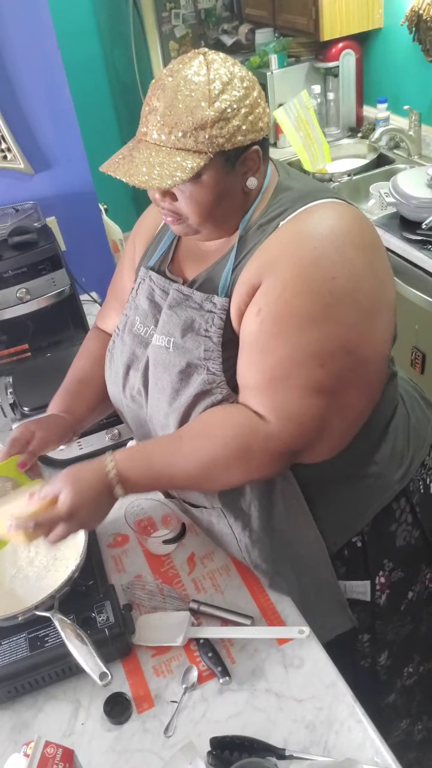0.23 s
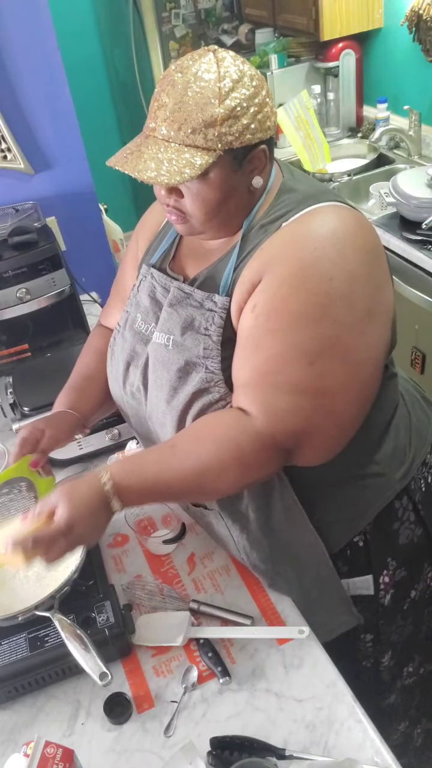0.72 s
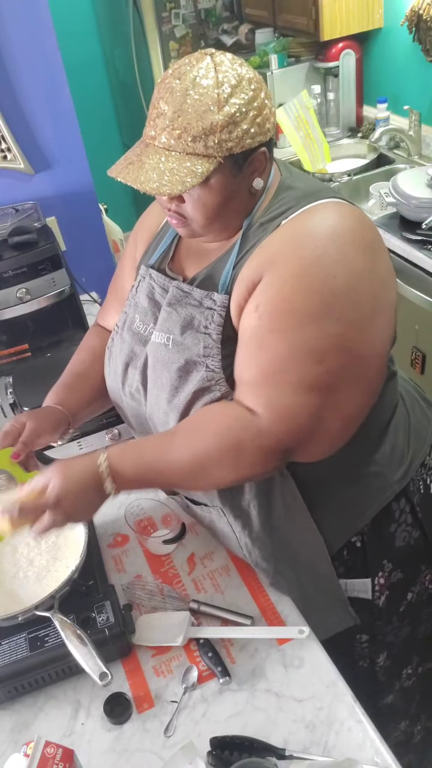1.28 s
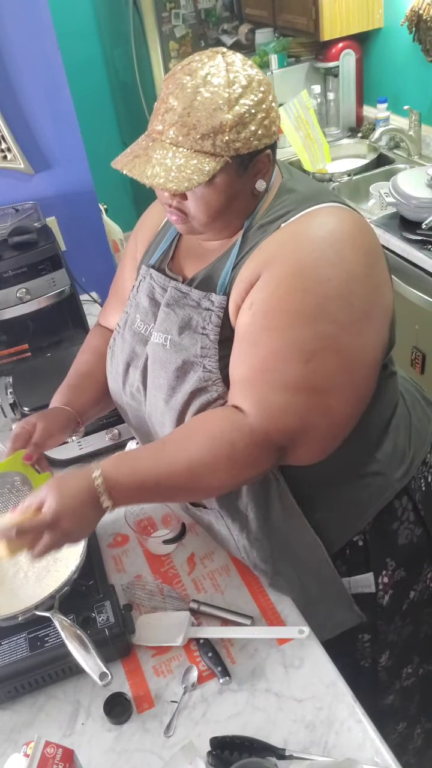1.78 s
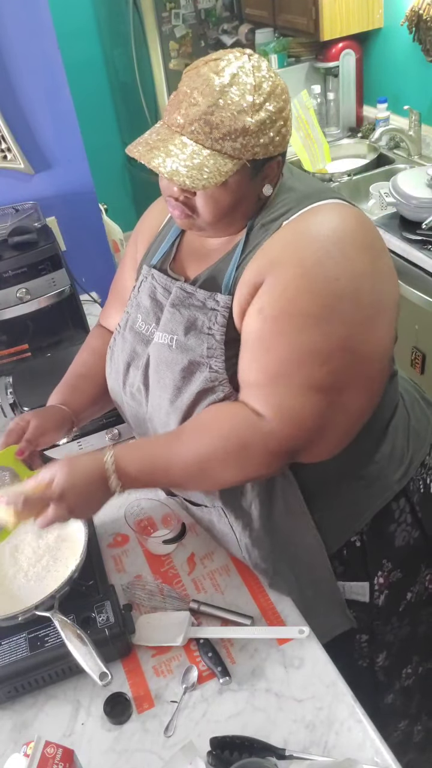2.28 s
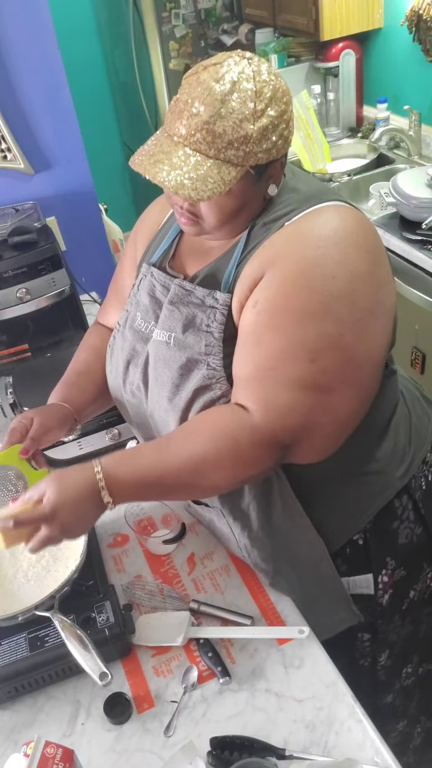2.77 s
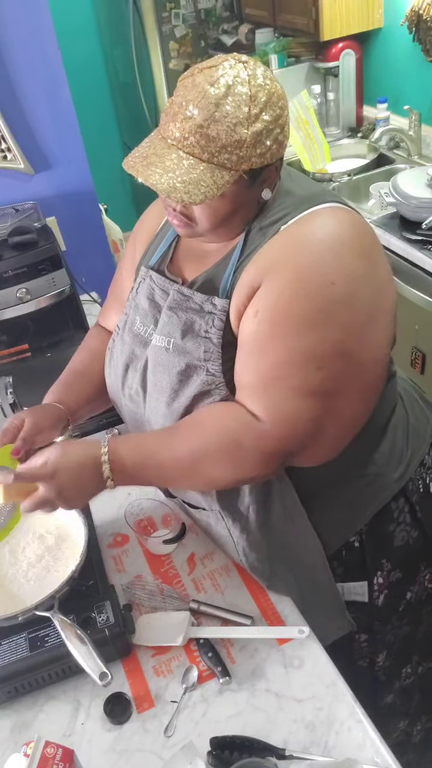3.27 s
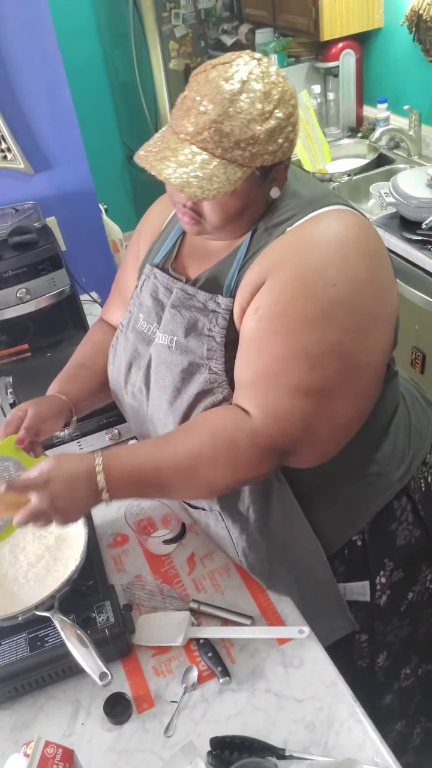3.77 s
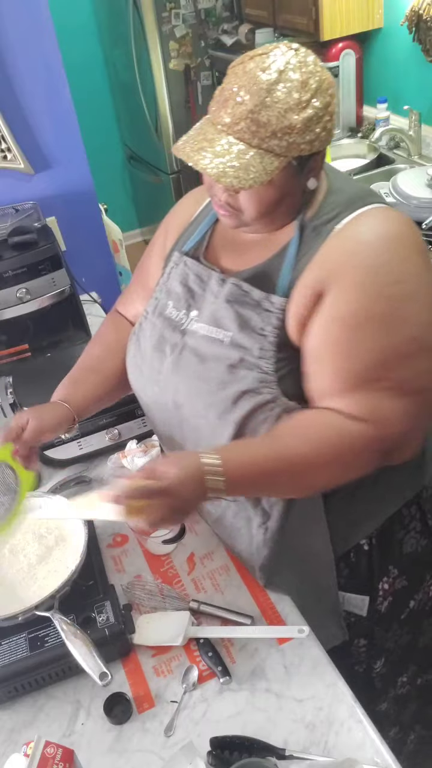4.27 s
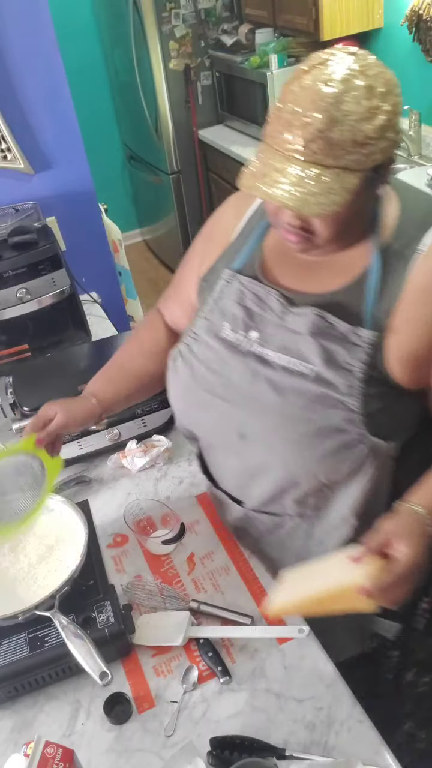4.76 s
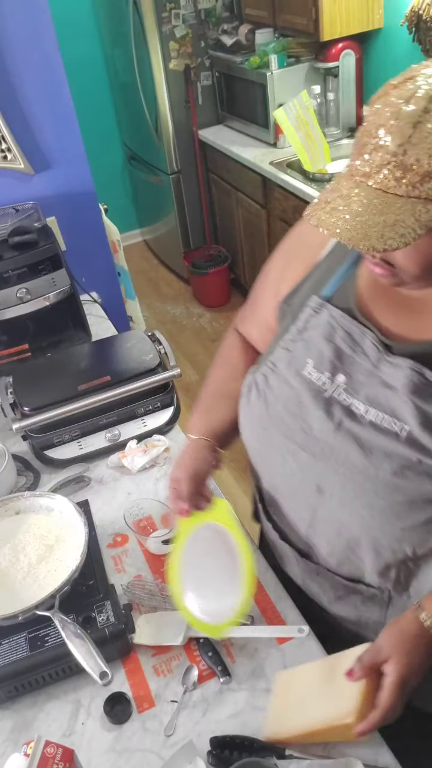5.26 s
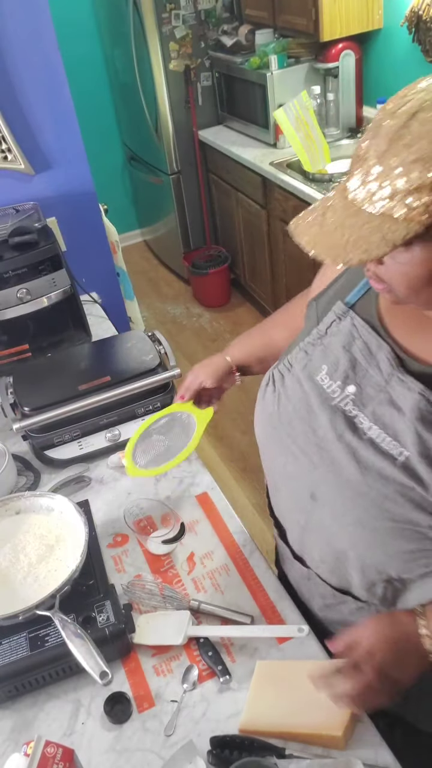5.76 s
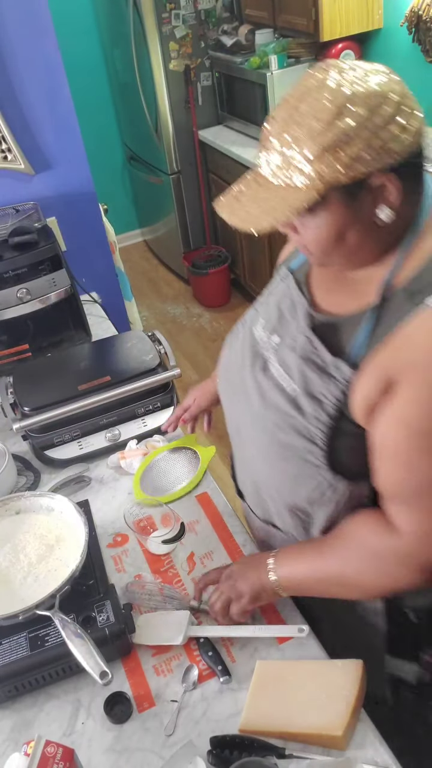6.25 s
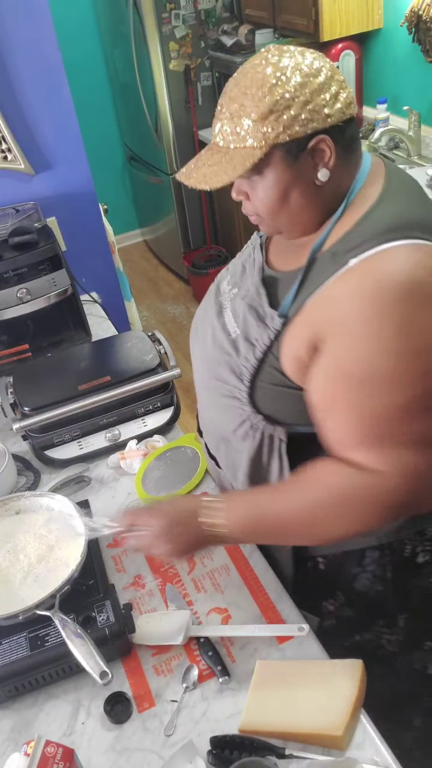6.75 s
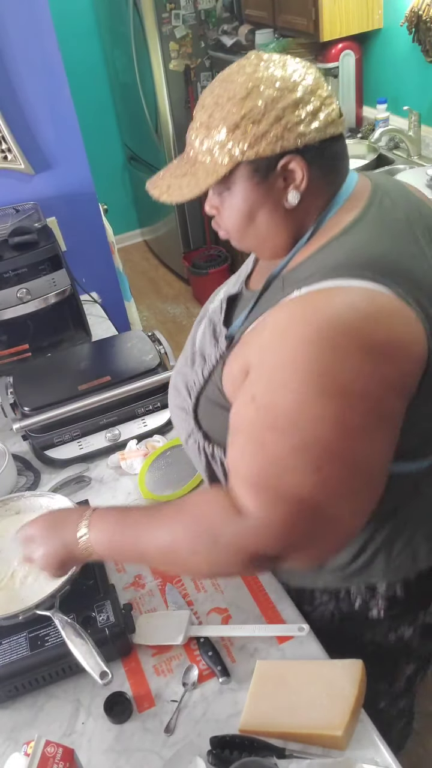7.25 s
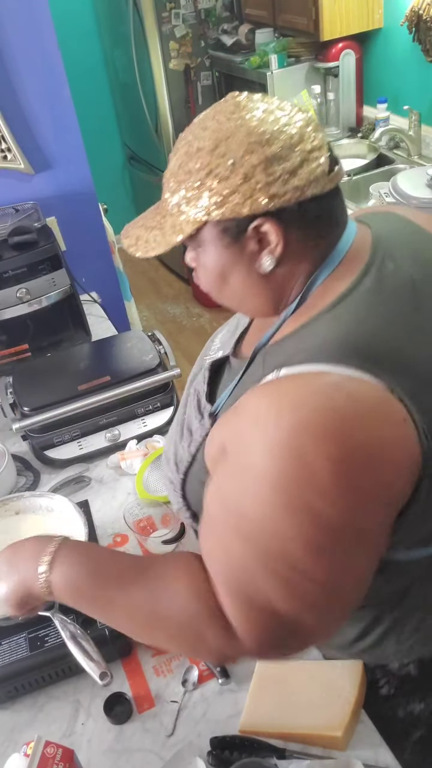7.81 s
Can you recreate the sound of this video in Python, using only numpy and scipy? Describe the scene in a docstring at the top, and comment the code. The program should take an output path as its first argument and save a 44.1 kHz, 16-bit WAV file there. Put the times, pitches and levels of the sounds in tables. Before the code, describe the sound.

A small hard-walled kitchen, heard closely in stereo, with a low rumble, faint appliance hum and a dull hiss that comes and goes. From 0.2 to about 3.8 seconds, cheese is rubbed on a hand grater in quick, uneven strokes, five or six a second: a quiet fine rasp, a duller plate rub and small hollow bumps, strongest at first. After light hand slides, the grater knocks a pan rim at 4.5, 4.6 and 4.8 seconds, ringing hollow and then brighter on the last. A soft, low footfall lands at 5.2. At 5.54 the heavy cheese block slaps the counter, booming with a slight utensil ring. A thin wire shimmer and plastic clatter follow around 5.9-6.2, then light brushing. From 6.8 to the end near 8 seconds, a wire whisk sweeps the pan about six times a second, scraping, ringing and splashing firmly.

```python
"""In a small, hard kitchen with a low room rumble, cheese is rubbed over a flat hand grater in quick strokes.
The grater is tapped three times on a pan rim, feet land, the cheese drops on the counter, tools clatter.
Then a wire whisk starts to stir the pan. Scraping sounds are random tiny snaps, coloured and shaped into strokes;
blows are fading tones plus short noise bursts. Echoes are added to the scrapes and the bursts."""
import sys
import numpy as np
from scipy import signal
from scipy.fft import rfft, irfft, next_fast_len
from scipy.io import wavfile

SR = 44100
rng = np.random.default_rng(int(sys.argv[2]) if len(sys.argv) > 2 else 0)


def transcribe(u):
    """Save the signal u as a 16-bit wav file named by the first command-line argument.

    u: samples, shape (n,) or (channels, n), limited to [-1, 1]; the rate is SR.
    q: integer samples, one column per channel.
    """
    v = np.clip(np.atleast_2d(u).T, -1, 1)
    q = np.round(v * 32767).astype(np.int16)
    wavfile.write(sys.argv[1], SR, q)


N = 354123  # length of the scene in samples


def amp(db):
    """Turn decibels into a gain."""
    return 10 ** (np.asarray(db) / 20)


def unit(x):
    """Scale a signal to an rms (average strength) of 1."""
    return x / np.sqrt(np.mean(x ** 2) + 1e-20)


def along(points, hz):
    """Read a curve of (frequency [Hz], value) points, spaced on a log axis."""
    point_hz, values = np.transpose(points)
    return np.interp(np.log(hz + 1), np.log(point_hz + 1), values)


def add(track, s, x):
    """Mix x into the track, starting at s seconds."""
    part = track[..., round(s * SR):][..., :x.shape[-1]]
    part += x[..., :part.shape[-1]]


def filtered(x, response):
    """Multiply the spectrum of x by a response that depends on frequency."""
    n = x.shape[-1]
    padded = next_fast_len(n + SR // 2, True)
    hz = np.fft.rfftfreq(padded, 1 / SR)
    return irfft(rfft(x, padded) * response(hz), padded)[..., :n]


def coloured(x, spectrum):
    """Give x a colour of (frequency [Hz], level [dB]) points."""
    return filtered(x, lambda hz: amp(along(spectrum, hz)))


def resonate(x, modes):
    """Let x excite resonances of (frequency [Hz], width [Hz], level [dB])."""
    def response(f):
        return sum(amp(db) * 1j * f * width / (centre ** 2 - f ** 2 + 1j * f * width)
                   for centre, width, db in modes)
    return filtered(x, response)


def grains(rate, spread_db):
    """Make random tiny snaps of unequal size, on average rate of them a second."""
    happens = rng.random(N) < rate / SR
    sizes = rng.standard_normal(N) * amp(spread_db * rng.standard_normal(N))
    return unit(happens * sizes)


# how alike the two microphones hear a sound: (frequency [Hz], left-right likeness [-1 to 1])
ALIKE = [(100, 0.97), (300, 0.79), (700, 0.56), (1200, -0.14), (2300, -0.11), (6000, 0.0036),
         (10000, -0.018)]


def half_turn(alike, hz):
    """Half the phase angle between the microphones that gives the wanted likeness."""
    return np.arccos(np.clip(along(alike, hz), -1, 1)) / 2


def ring(modes, attack, alike=ALIKE):
    """Fading tones after one blow; the higher ones reach the two microphones out of step."""
    t = np.arange(SR) / SR
    out = np.zeros((2, SR))
    for hz, t60, db in modes:
        apart = half_turn(alike, hz) * rng.choice([-1, 1])
        fade = amp(db - 60 * t / t60)
        out += fade * np.sin(2 * np.pi * hz * t + np.array([[apart], [-apart]]))
    return out * (1 - np.exp(-t / attack)) * (1 - t ** 4)  # soft start, silent end


def diffuse(pair):
    """Blend two unrelated signals as two close microphones hear them: alike in the bass only."""
    def blend(hz):
        turn = half_turn(ALIKE, hz)
        return np.array([np.cos(turn), np.sin(turn)])
    mid, side = filtered(pair, blend)
    return np.array([mid + side, mid - side])


# how long the room's echoes last: (frequency [Hz], time to fall by 60 dB [s])
KITCHEN = [(80, 0.34), (300, 0.29), (1000, 0.38), (4000, 0.29), (8000, 0.33), (15000, 0.28)]


def kitchen(x, direct_db):
    """Add the walls' dense echoes; direct_db sets the direct sound against them, at about the same energy."""
    hz, t, bins = signal.stft(rng.standard_normal((2, SR // 2)), SR, nperseg=256)
    fade = amp(-60 * t / along(KITCHEN, hz)[:, None])
    tail = diffuse(signal.istft(bins * fade, SR, nperseg=256)[1])
    tail = np.pad(tail / np.linalg.norm(tail[0]), ((0, 0), (SR // 500, 0)))  # echoes start 2 ms late
    tail[1, 0] = tail[0, 7] = amp(direct_db)  # the right microphone is nearer: 7 samples earlier
    return signal.fftconvolve(x[None], tail / np.linalg.norm(tail[0]), axes=1)[:, :N]


def knock(colour_db, t60, direct_db, size=4096):
    """A short coloured noise burst in the room, of rms 1 over a tenth of a second."""
    # turn the colour into a filter that does not start before the blow (minimum phase)
    cepstrum = irfft(colour_db(np.fft.rfftfreq(size, 1 / SR)) * np.log(10) / 20)
    causal = np.r_[cepstrum[0], 2 * cepstrum[1:size // 2], np.zeros(size // 2)]
    colour_filter = irfft(np.exp(rfft(causal)))
    t = np.arange(SR // 4) / SR
    burst = rng.standard_normal(len(t)) * amp(-60 * t / t60)
    x = kitchen(signal.fftconvolve(burst, colour_filter), direct_db)
    return x / np.sqrt(np.sum(x ** 2) / 2 / (SR / 10))


def moving(x, gain, direct_db, shift_db, size=12288):
    """A travelling contact: its colour and its echo pattern keep changing. The level follows gain."""
    out, window = np.zeros((2, N)), np.hanning(size) ** .5
    bands = np.geomspace(400, 15000, 18)
    for i in range(-size // 2, N, size // 2):  # overlapping pieces
        start = max(i, 0)
        if gain[start:start + size].max() > 1e-5:  # skip silent pieces
            piece = x[start:start + size] * window[:N - start]
            shifts_db = shift_db * rng.standard_normal(len(bands))
            piece = coloured(piece, np.c_[bands, shifts_db])
            add(out, start / SR, kitchen(unit(piece), direct_db))
    return gain * out


CATCH_PER_S, CATCH_DB = 70, 1.33  # a stroke catches and slips: random level points a second, spread [dB]


def stroked(starts, lengths, levels_db, attack_s, sag_db_per_s, release_db_per_s):
    """The gain of a series of uneven strokes: each swells, sags while it lasts and then dies away."""
    power, t = np.zeros(N), np.arange(SR // 2) / SR
    swell = np.sin(np.pi / 2 * np.minimum(t / attack_s, 1)) ** 2
    for s, length, db in zip(starts, lengths, levels_db):
        sag_db = sag_db_per_s * np.maximum(t - attack_s, 0)
        release_db = release_db_per_s * np.maximum(t - length, 0)
        add(power, s, (swell * amp(db - sag_db - release_db)) ** 2)
    knots = rng.standard_normal(size=4096)
    catches = np.interp(np.arange(N) / SR * CATCH_PER_S, np.arange(len(knots)), knots)
    return np.sqrt(power) * amp(CATCH_DB * catches)


# colour of the low rumble: (frequency [Hz], relative level [dB])
ROOM_TONE = [(20, -52.5), (45, -3.5), (66, 3), (100, 0), (150, -13), (300, -14.5), (600, -28), (1200, -29),
             (3000, -34), (6000, -38), (8500, -51), (15000, -39)]
# steady tones of an appliance: (frequency [Hz], rms level [dB])
HUM = [(68, -64), (239, -66.5)]


def room_tone():
    """A low rumble of coloured noise with a faint appliance hum of pure tones."""
    t = np.arange(N) / SR
    hum = sum(amp(db) * np.sqrt(2) * np.sin(2 * np.pi * hz * t) for hz, db in HUM)
    rumble = diffuse(coloured(rng.standard_normal((2, N)), ROOM_TONE))
    return hum + amp(-55.0) * unit(rumble)


# how the hiss swells and fades: (time [s], level [dB])
HISS_LEVEL = [(0.0, -62), (0.18, -89), (0.75, -62.5), (1.09, -77), (1.45, -57.5), (1.75, -61.5),
              (2.07, -76.5), (2.45, -60.5), (2.76, -84), (2.9, -60.5), (3.62, -77), (3.78, -63),
              (4.182, -60), (4.45, -91), (5.45, -56.5), (5.85, -62.5), (6.45, -60), (6.619, -92.5)]
# colour of the hiss: (frequency [Hz], relative level [dB])
HISS = [(400, -9), (560, -3), (720, -18), (950, -8), (1650, -23.5), (2100, -16), (2400, -17.5),
        (3050, -17.5), (3500, -21.5), (4050, -18), (4500, -37.5), (4850, -25.5), (5150, -30), (5800, -21),
        (6500, -37.5), (12000, -49)]


def hiss():
    """A faint, dull hiss of coloured noise comes and goes in the background."""
    level_db = np.interp(np.arange(N) / SR, *np.transpose(HISS_LEVEL))
    noise = coloured(rng.standard_normal((2, N)), HISS)
    noise = filtered(noise, lambda hz: hz ** 2 / (hz ** 2 + 350 ** 2))  # thin out the bass
    return amp(level_db) * unit(diffuse(noise))


# weight lands on the floor: (time [s], relative level [dB])
STEPS = [(5.209, -21.5), (5.285, -29), (5.365, -34), (5.743, -42), (6.722, -43.5)]
# tones of the floor boards: (frequency [Hz], time to fall by 60 dB [s], relative level [dB])
FLOOR = [(43.2, 0.37, -14), (72.7, 0.25, 0.5), (79.9, 0.24, -4.5), (127.6, 0.19, -15.5)]
# colour of the sole's pat: (frequency [Hz], relative level [dB])
SOLE = [(80, 6), (350, -8), (800, -15.5), (2000, -21.5), (6000, -39.5), (9000, -58)]
# likeness when floor or counter shakes: (frequency [Hz], left-right likeness [-1 to 1])
SHAKEN = [(80, 0.1), (130, 0.38), (300, 0.62), (700, 0.7), (1200, -0.2), (2300, -0.1)]


def steps():
    """A soft sole pats the floor and sets the boards swinging at their low pitches."""
    out = np.zeros((2, N))
    for s, db in STEPS:
        add(out, s, amp(db + 7) * ring(FLOOR, attack=0.025, alike=SHAKEN))
        add(out, s, amp(db - 20.5) * knock(lambda hz: along(SOLE, hz), t60=0.16, direct_db=-1.5))
    return out


# tools touch and rattle, and the sole squeaks as the feet land at 5.2 s: (time [s], relative level [dB], treble
# tilt [about dB per octave])
CLATTER = [(0.917, -51.5, -2), (5.209, -52, 4), (5.23, -47.5, 5), (5.994, -28.5, 6.5), (6.115, -21, 0.5),
           (6.124, -43, -7), (6.147, -24.5, -3.5), (6.174, -24, -2.5), (6.194, -32.5, -1),
           (6.207, -35, -19.5)]
# colour of a rattle: (frequency [Hz], relative level [dB])
TOOL = [(88, -27), (150, -31), (216, -12), (343, -11), (505, 1), (649, -7), (728, -3), (936, -7),
        (2360, -11.5), (5950, -24.5), (8750, -41), (15000, -42.5)]
# light slides of hand and tools: (middle time [s], length [s], level [dB])
SLIDES = [(4.292, 0.11, -54), (4.475, 0.14, -54), (5.313, 0.24, -66.5), (5.468, 0.048, -57),
          (6.39, 0.15, -58.5), (6.503, 0.14, -55), (6.754, 0.18, -58.5)]
# colour of a slide: (frequency [Hz], relative level [dB])
SLIDE = [(600, -57.5), (1800, 2), (3000, 3.5), (6000, -5), (8500, -17.5), (12000, -15.5), (15000, -22.5)]


def tools():
    """The plastic grater rattles to rest in short bursts and a sole squeaks as the feet land; hand and tools
    brush over the counter."""
    out, brush = np.zeros((2, N)), np.zeros(N)
    for s, db, tilt_db in CLATTER:
        colour = lambda hz: along(TOOL, hz) + tilt_db * np.log2(1 + hz / 500)
        add(out, s, amp(db - 16.0) * knock(colour, t60=0.0041, direct_db=-10.5))
    for s, length, db in SLIDES:
        add(brush, s - length / 2, amp(db) * np.hanning(int(length * SR)) ** .5)
    rubbing = unit(coloured(grains(3400, 2.7), SLIDE))
    return out + kitchen(brush * rubbing, direct_db=-5)


# one light touch of the whisk: (start time [s], length [s], level [dB])
BRUSH = (5.86, 0.14, -60.5)
# thin ring as the hand finds the whisk: (frequency [Hz], width [Hz], relative level [dB])
BRUSHED_WIRES = [(3990, 60, 2), (5500, 67, -6)]


def brushed_wires():
    """A light touch makes the whisk's wires sing for a moment at two high pitches."""
    s, length, db = BRUSH
    touch = stroked([s], [length], [db], attack_s=0.087, sag_db_per_s=5, release_db_per_s=200)
    singing = unit(resonate(grains(2000, 2), BRUSHED_WIRES))
    return touch * kitchen(singing, direct_db=-9)


# the cheese lands: (time [s], level [dB])
DROP = (5.536, -22)
# colour of the slap: (frequency [Hz], relative level [dB])
SLAP = [(18, -59.5), (38, -8), (75, 3), (225, -6.5), (350, -3), (747, -5), (808, -10.5), (996, -8),
        (1260, -9), (1510, -13), (4540, -21), (8720, -36.5), (12300, -34.5), (15500, -32)]
# tones of the counter: (frequency [Hz], time to fall by 60 dB [s], relative level [dB])
COUNTER = [(76.1, 0.4, -17.5), (128, 0.13, -19), (184, 0.14, -23), (309.5, 0.24, -24.5),
           (372, 0.071, -11.5), (397, 0.12, -25), (503, 0.74, -41.5), (583, 0.13, -30), (652, 0.054, -16.5),
           (1000, 0.17, -39), (1104, 0.061, -12.5), (1244, 0.12, -27.5), (1465, 0.075, -28)]
# steel lying on the counter: (frequency [Hz], relative level [dB], time to fall by 60 dB [s])
UTENSILS = [(4300, -9.5, 0.29), (4581, 8, 0.19), (5950, 4.5, 0.33)]


def cheese_drop():
    """The heavy block slaps the counter, which booms and sets the utensils ringing."""
    out = np.zeros((2, N))
    s, db = DROP
    slap = lambda hz: along(SLAP, hz)
    add(out, s, amp(db - 3) * knock(slap, t60=0.019, direct_db=-7.5))  # an edge lands first
    add(out, s + 0.0028, amp(db) * knock(slap, t60=0.038, direct_db=-4.5))  # then the face
    add(out, s, amp(3.0) * ring(COUNTER, attack=0.0015, alike=SHAKEN))
    steel = [(hz, t60, level) for hz, level, t60 in UTENSILS]
    add(out, s, amp(-39.5) * ring(steel, attack=0.0064))
    return out


# grater on the pan: (time [s], relative ring level [dB], place [0 = plastic frame, 1 = steel edge],
# relative clack level [dB])
TAPS = [(4.482, -4.5, 0.44, -36), (4.624, -13, 0, -25), (4.631, -1, 0.11, -24), (4.836, -0.5, 0.93, -28.5)]
# pan and grater ring together: (frequency [Hz], time to fall by 60 dB [s],
# level struck by the frame [dB], level struck by the edge [dB]), before the ring level of each tap
PAN = [(391, 0.3, -44, -47), (478, 0.25, -32, -34), (646, 0.6, -28, -37), (701, 0.9, -42, -37),
       (890, 0.3, -27, -45), (1125, 0.26, -11, -30), (1160, 0.2, -19, -37), (1227, 1.0, -36, -32),
       (1268, 0.13, -17, -30), (1502, 0.3, -23, -44), (1590, 0.36, -29, -29), (1900, 0.48, -18, -42),
       (1945, 0.45, -36, -30), (2406, 0.45, -29, -33), (2562, 0.3, -33, -42), (2837, 0.48, -38, -36),
       (4048, 0.38, -48, -36), (4615, 0.4, -49, -32), (4645, 0.38, -52, -33), (4672, 0.41, -59, -30),
       (4724, 0.41, -55, -31), (5593, 0.27, -57, -38)]
# dead tones of the hand-held frame: (frequency [Hz], time to fall by 60 dB [s], relative level [dB])
GRIP = [(430, .07, -10), (1075, .06, -7)]
# colour of a clack by the frame: (frequency [Hz], relative level [dB])
FRAME_CLACK = [(35, -50), (60, 16.5), (115, -30), (248, -11), (291, -18.5), (559, -13), (673, -18),
               (1150, -8), (1380, -13.5), (1910, -13), (2150, -22.5), (2470, -12.5), (8000, -43),
               (11500, -47.5), (15500, -45)]
# colour of a clack by the edge: (frequency [Hz], relative level [dB])
EDGE_CLACK = [(59, -32.5), (100, -12), (477, 3.5), (552, -17), (627, -5), (917, -18), (1110, 2.5),
              (1310, -9), (1920, -3.5), (3180, -7.5), (4660, -7), (5070, -10), (15500, -24)]


def taps():
    """The grater is knocked clean on the pan; the steel edge wakes higher tones than the plastic frame."""
    out = np.zeros((2, N))
    boom = [mode for mode in COUNTER if mode[0] < 200]  # only the deepest tones pass through the hob
    for s, db, place, clack_db in TAPS:
        place = np.clip(place, 0, 1)
        modes = [(hz, t60, frame_db + place * (edge_db - frame_db)) for hz, t60, frame_db, edge_db in PAN]
        add(out, s, amp(db) * ring(modes, attack=.002))
        add(out, s, amp(clack_db + 16.5) * (1 - place) * ring(GRIP, attack=0.00092))
        add(out, s, amp(db - 18.5 + 3 * place) * ring(boom, attack=.015))
        colour = lambda hz: (1 - place) * along(FRAME_CLACK, hz) + place * along(EDGE_CLACK, hz)
        add(out, s, amp(clack_db + 1.0) * knock(colour, t60=0.022, direct_db=-4.5))
    return out


# one sweep of the whisk through the pan:
# (start time [s], length [s], scrape level [dB], wire ring level [dB], splash level [dB])
WHISKING = [ (6.798, 0.084, -50.5, -55, -55), (6.901, .105, -33.5, -44, -38.5),
            (7.039, 0.11, -33, -48, -37), (7.209, 0.12, -35.5, -39.5, -41.5),
            (7.343, 0.13, -34, -38.5, -35), (7.52, 0.15, -30.5, -38.5, -33.5),
            (7.72, 0.14, -31, -35.5, -37.5), (7.914, 0.13, -33.5, -50, -35.5), ]
# the wire loops: (frequency [Hz], width [Hz], relative level [dB])
WIRES = [(484, 14, -3), (508, 14, -2), (556, 12, -4), (576, 10, 0), (630, 10, -3), (685, 22, -5),
         (735, 10, 3), (768, 10, 1)]
# higher tones of the wires and the pan: (frequency [Hz], width [Hz], relative level [dB])
OVERTONES = [(1130, 10, 0), (1270, 40, -6), (1373, 30, -3), (1871, 16, -2), (2063, 30, -2), (2411, 10, -1),
             (2726, 12, -1), (2909, 12, 1), (3129, 12, 2), (3690, 40, -6), (3951, 20, -1), (6850, 60, -9)]
# colour of the scrape: (frequency [Hz], relative level [dB])
SCRAPE = [(200, -39), (430, -27), (600, 4), (900, -12), (1350, 7.5), (1600, -1.5), (2000, 7.5), (2500, 1.5),
          (3700, 3.5), (4700, -3.5), (6800, -9), (8200, -43), (15000, -12.5)]
# colour of the splash: (frequency [Hz], relative level [dB])
SPLASH = [(3000, -1), (6500, 4.5), (8200, -4), (9300, 3.5), (10300, 2.5), (12500, 6), (15500, 2)]
SWEEP_RISE_S, SWEEP_SAG_DB_PER_S = 0.077, 14  # the wires gather speed, then slow in the sauce
SCRAPE_RELEASE_DB_PER_S, WIRE_RELEASE_DB_PER_S, SPLASH_RELEASE_DB_PER_S = 139, 170, 133
WIRE_LAG_S = 0.0099  # the loops ring up a little after the scrape
WIRE_PAN_DB = 2  # the loops ring a little to the left: left up, right down by this much


def whisk():
    """Wires catch and slip on the pan's bottom, ring at their own pitches and splash through the sauce."""
    starts, lengths, scrape_db, wire_db, splash_db = np.transpose(WHISKING)
    scrape = stroked(starts, lengths, scrape_db, SWEEP_RISE_S, SWEEP_SAG_DB_PER_S, SCRAPE_RELEASE_DB_PER_S)
    wires = stroked(starts + WIRE_LAG_S, lengths, wire_db,
                    SWEEP_RISE_S, SWEEP_SAG_DB_PER_S, WIRE_RELEASE_DB_PER_S)
    splash = stroked(starts, lengths, splash_db, SWEEP_RISE_S, SWEEP_SAG_DB_PER_S, SPLASH_RELEASE_DB_PER_S)
    slips = grains(1000, 3.9)
    out = moving(coloured(slips, SCRAPE), scrape, direct_db=-9.0, shift_db=0.5)
    out += moving(resonate(slips, OVERTONES), amp(-5) * scrape, direct_db=-21.0, shift_db=3.5)
    # keep the loops' ring between about 470 and 880 Hz
    band = lambda hz: 1 / (1 + (470 / (hz + 1)) ** 30 + (hz / 880) ** 16)
    loops = filtered(resonate(grains(250, 2), WIRES), band)
    pan_gain = amp([[WIRE_PAN_DB], [-WIRE_PAN_DB]])
    out += pan_gain * moving(loops, wires, direct_db=-10.5, shift_db=1.5)
    rumble = unit(resonate(slips, [(73, 5.5, 14), (110, 13, -16)]))  # the pan rumbles on the hob
    out += amp(-20.5) * scrape * rumble
    drops = coloured(grains(2500, 1.9), SPLASH)
    return out + moving(drops, splash, direct_db=-26, shift_db=-2.0)


# the cheese goes to and fro on the teeth, a long push then a lighter return:
# (start time [s], length [s], rasp level [dB], plate level [dB])
GRATING = [ (0.198, 0.088, -52, -59), (0.387, 0.035, -54, -54), (0.574, 0.046, -52, -56),
           (0.756, 0.06, -61.5, -58.5), (0.89, 0.1, -58.5, -61), (1.11, 0.032, -81, -66),
           (1.244, 0.11, -57, -57), (1.422, 0.046, -62.5, -61), (1.561, .11, -61, -62.5),
           (1.75, 0.067, -64, -65), (1.91, 0.11, -62.5, -71), (2.103, 0.083, -70, -65),
           (2.259, 0.11, -60.5, -58.5), (2.453, 0.051, -64.5, -60.5), (2.6, 0.076, -56.5, -60.5),
           (2.784, .085, -71, -61.5), (2.938, .11, -62, -65), (3.127, .09, -74, -67),
           (3.295, 0.094, -66, -65.5), (3.644, 0.11, -63, -67.5), ]
# colour of the rasp: (frequency [Hz], relative level [dB])
RASP = [(1500, -49), (2500, -11), (4500, -4), (6500, 1), (8500, -9.5), (10000, -4), (12000, 2.5),
        (15000, 1)]
# colour of the plate's rub: (frequency [Hz], relative level [dB])
PLATE = [(150, -6), (400, -3), (850, -0.5), (1300, -5.5), (1850, 4), (2500, -2.5), (3050, 0.5),
         (3550, -1.5), (4500, -2), (8000, -17.5)]
# the block bumps the grater's frame as it turns: (time [s], level [dB], ring pitch [Hz])
BUMPS = [(0.256, -62.5, 790), (0.446, -57, 773), (0.613, -62, 415), (1.154, -59, 840), (1.79, -61, 694),
         (2.499, -63.5, 840), (2.648, -63, 1760), (2.835, -60, 600)]
# colour of a bump: (frequency [Hz], relative level [dB])
FRAME = [(150, -17), (280, 7.5), (600, -10), (850, -1.5), (1200, -10), (1800, -2), (3500, -6), (8000, -31)]
BITE_S, BITE_SAG_DB_PER_S = 0.057, 15  # the teeth take hold; the pressure eases along the stroke
RASP_RELEASE_DB_PER_S, PLATE_RELEASE_DB_PER_S = 197, 152  # as the hand slows, the rasp fades faster


def grating():
    """The teeth snap off crumbs: a fine rasp, a duller rub from the plate, and hollow bumps at the turns."""
    starts, lengths, rasp_db, plate_db = np.transpose(GRATING)
    rasp = stroked(starts, lengths, rasp_db, BITE_S, BITE_SAG_DB_PER_S, RASP_RELEASE_DB_PER_S)
    plate = stroked(starts, lengths, plate_db, BITE_S, BITE_SAG_DB_PER_S, PLATE_RELEASE_DB_PER_S)
    crumbs = coloured(grains(5000, 2), RASP)
    rub = coloured(grains(1500, 7.2), PLATE)
    out = moving(crumbs, rasp, direct_db=-15.5, shift_db=-2.5)
    out += moving(rub, plate, direct_db=-10.5, shift_db=4.0)
    for s, db, pitch_hz in BUMPS:
        # a 13 dB peak at the bump's own pitch
        colour = lambda hz: along(FRAME, hz) + 13 / (1 + ((hz - pitch_hz) / 60) ** 2)
        add(out, s, amp(db) * knock(colour, t60=0.12, direct_db=4.0))
    return out


def scene():
    """Everything in the kitchen, from the background to the grater."""
    background = room_tone() + hiss() + steps()
    handling = tools() + brushed_wires() + cheese_drop()
    return background + handling + taps() + whisk() + grating()


# how the microphones differ: (frequency [Hz], left minus right [dB])
BALANCE = [(200, 0), (800, 1.5), (2200, 1), (5000, -5), (9000, -1), (14000, 2.5)]
TOP_HZ = 15650  # almost nothing is kept above this


def record(dry):
    """The two microphones differ a little in colour and keep almost nothing above the band limit."""
    def response(hz):
        balance = amp(np.outer([.5, -.5], along(BALANCE, hz)))
        return balance / (1 + (hz / TOP_HZ) ** 200)
    return filtered(dry, response)


dry = scene()
out = record(dry)
transcribe(out)
```